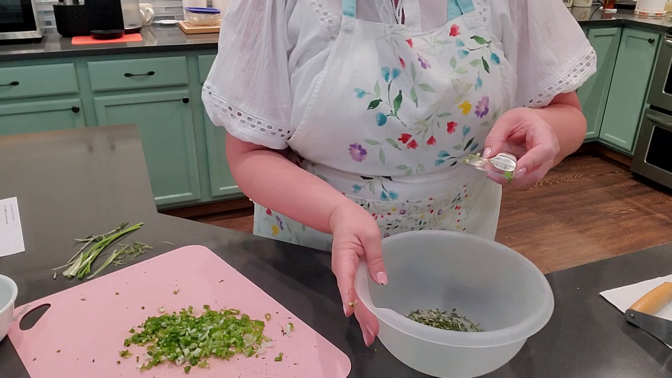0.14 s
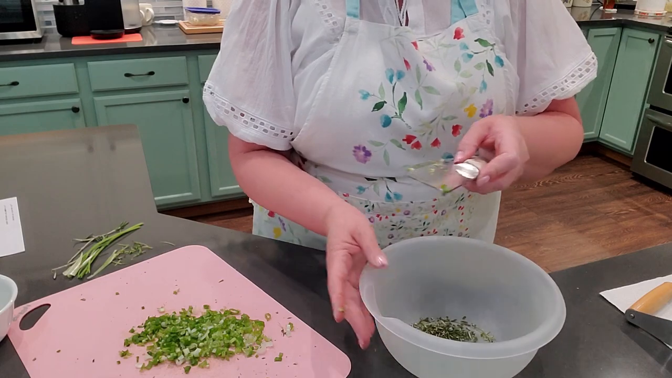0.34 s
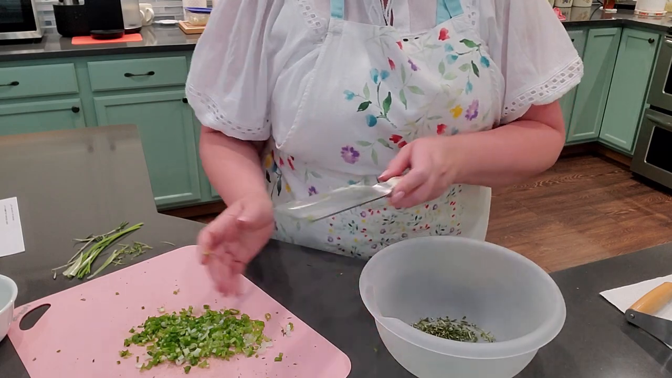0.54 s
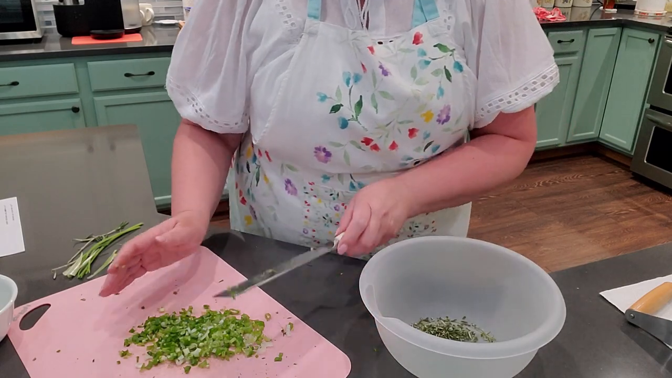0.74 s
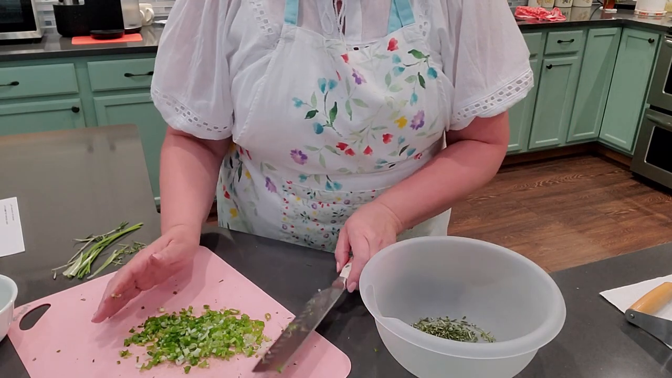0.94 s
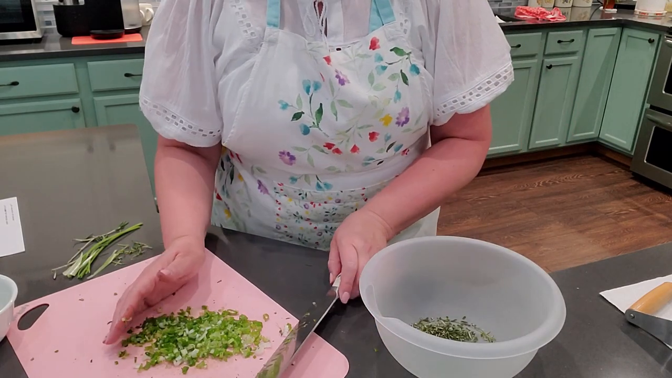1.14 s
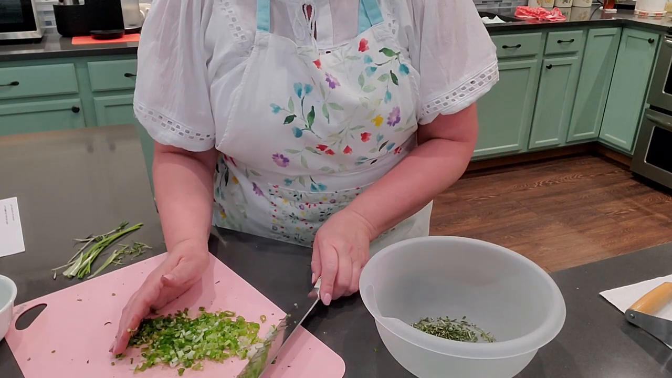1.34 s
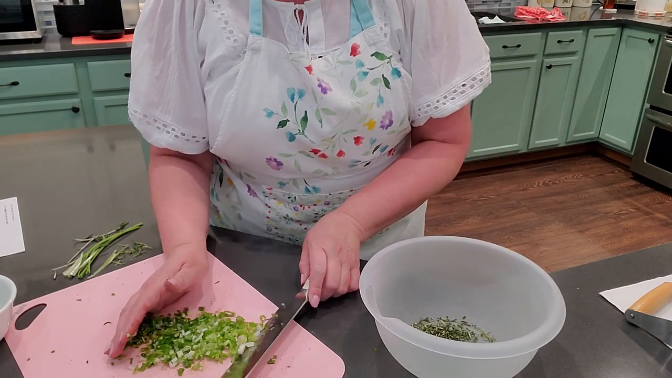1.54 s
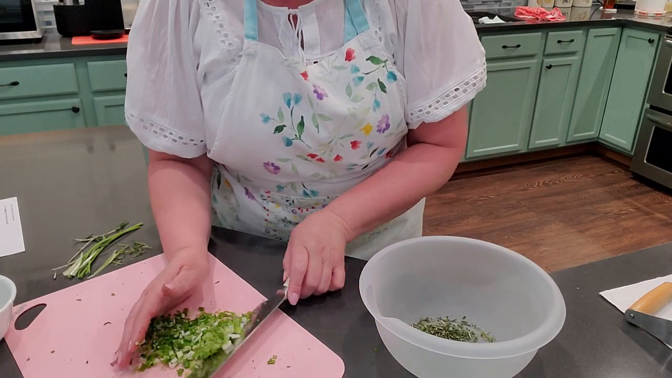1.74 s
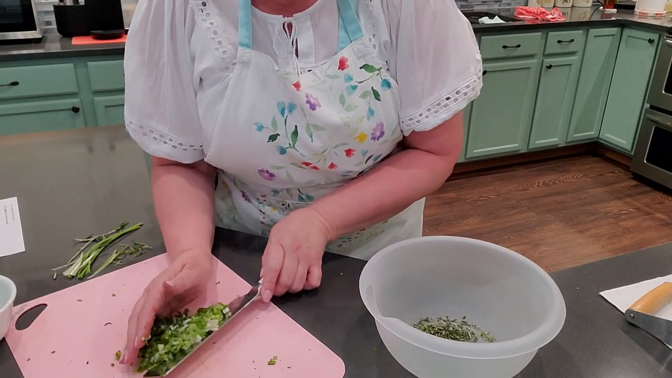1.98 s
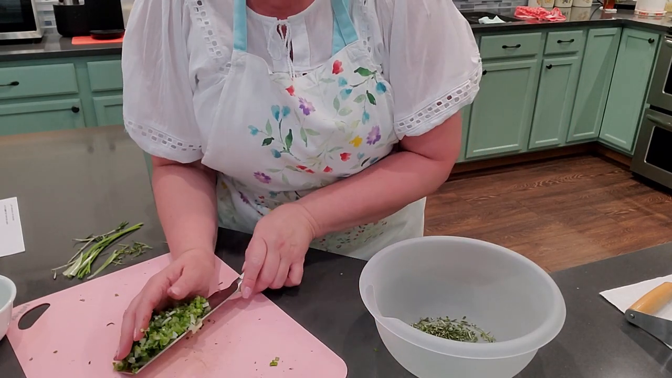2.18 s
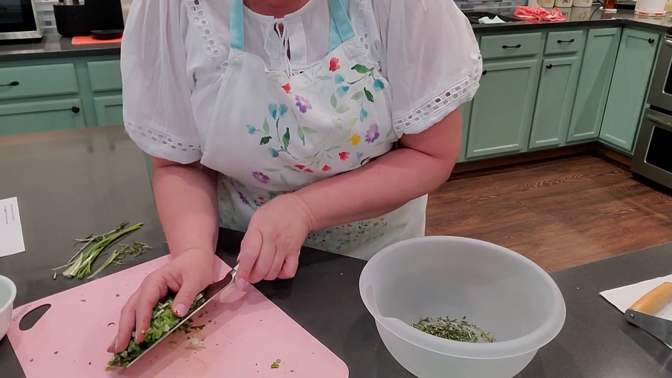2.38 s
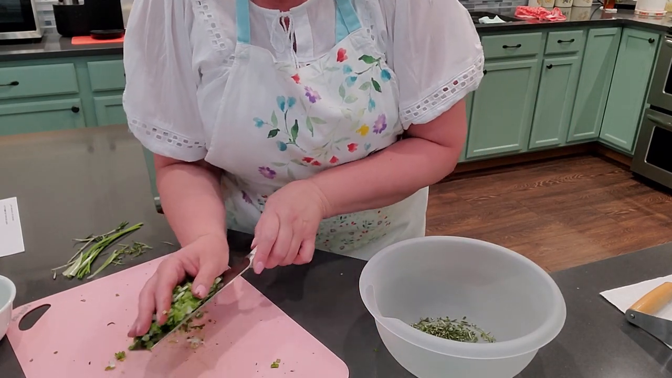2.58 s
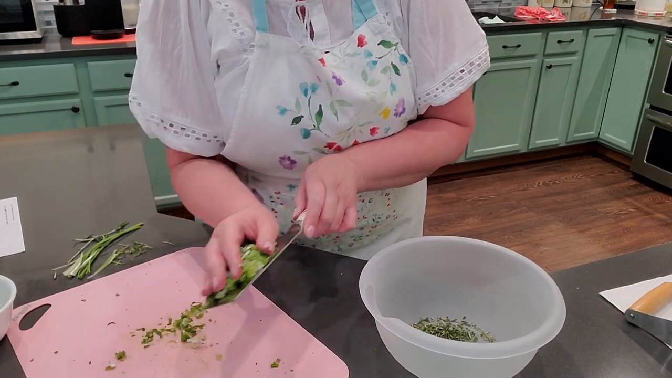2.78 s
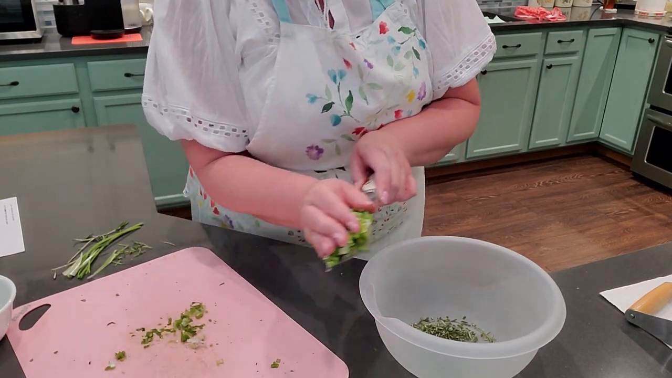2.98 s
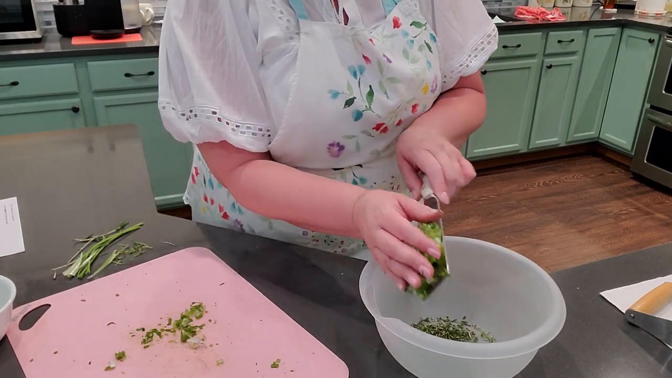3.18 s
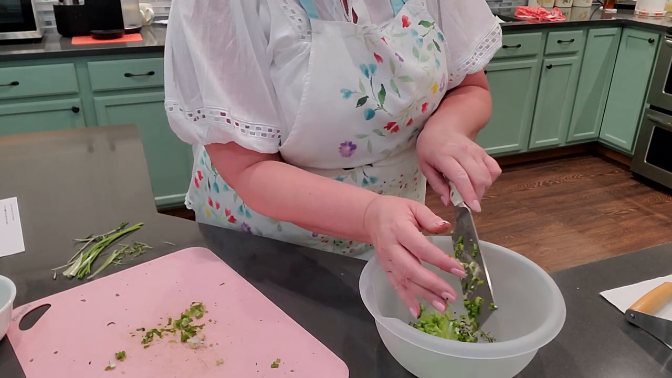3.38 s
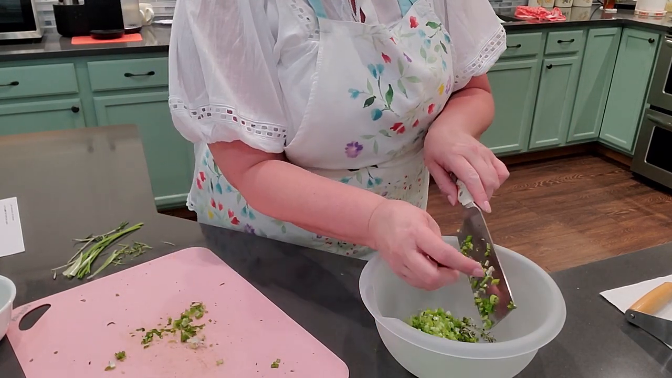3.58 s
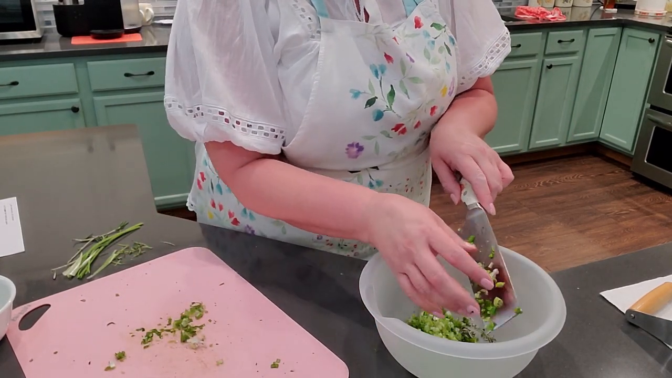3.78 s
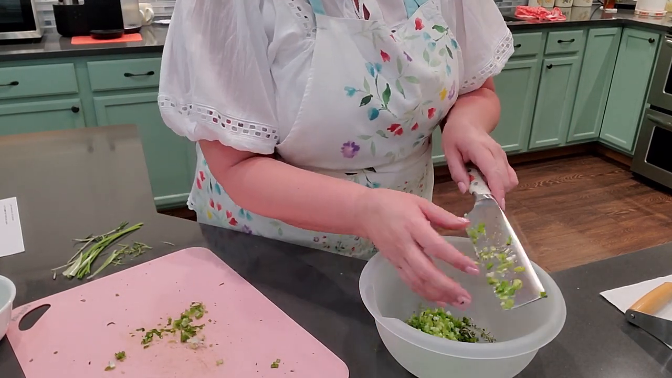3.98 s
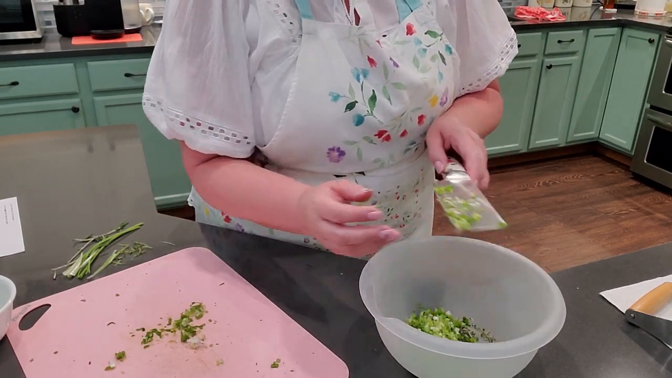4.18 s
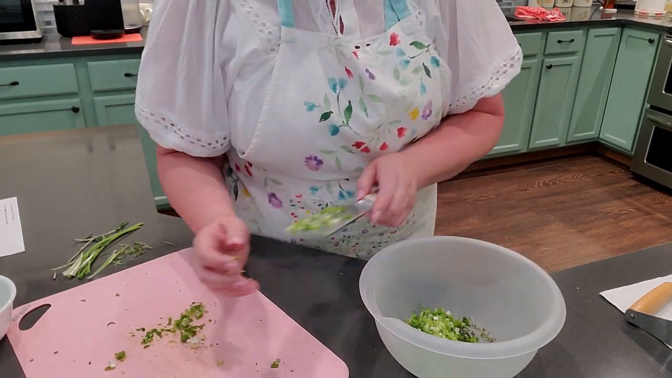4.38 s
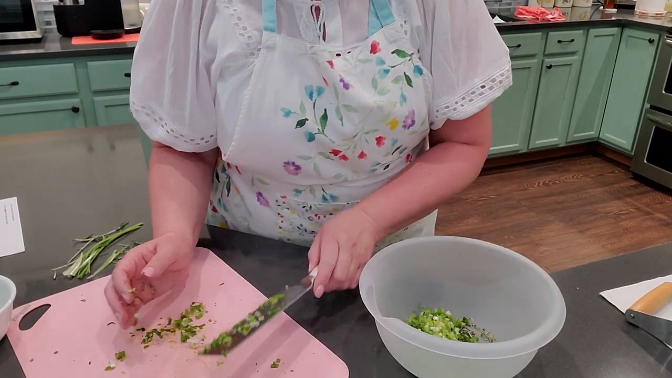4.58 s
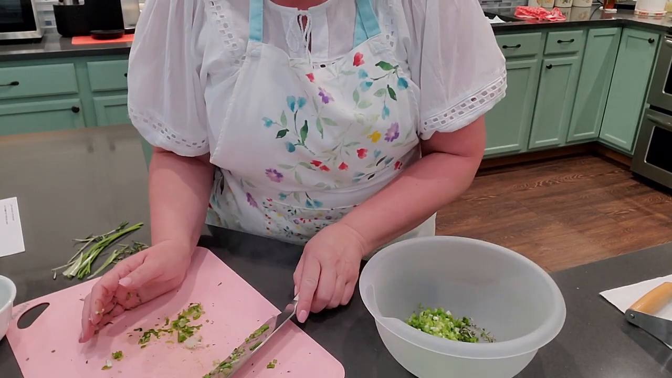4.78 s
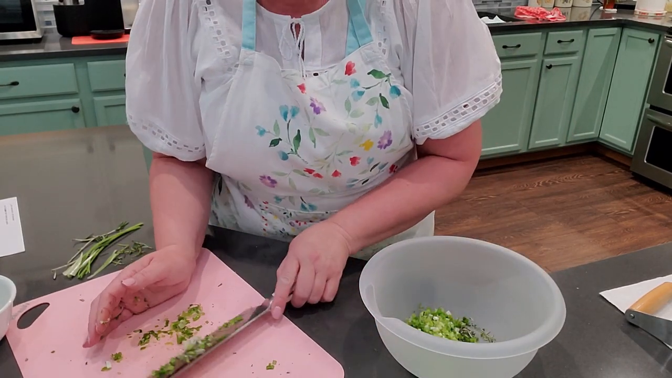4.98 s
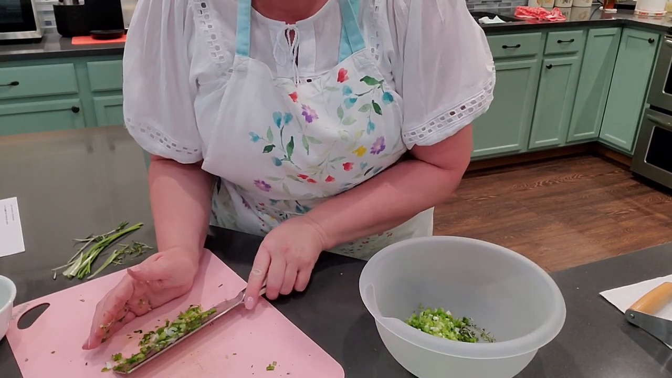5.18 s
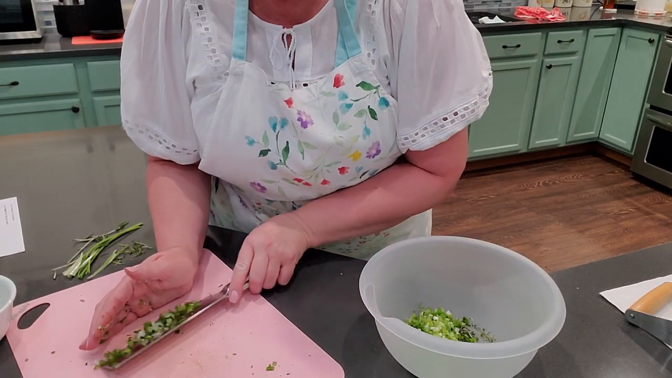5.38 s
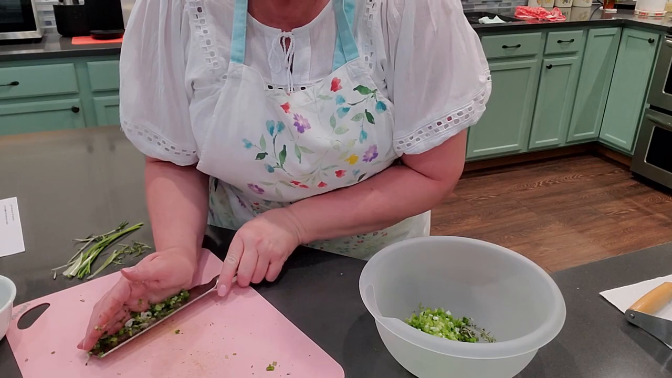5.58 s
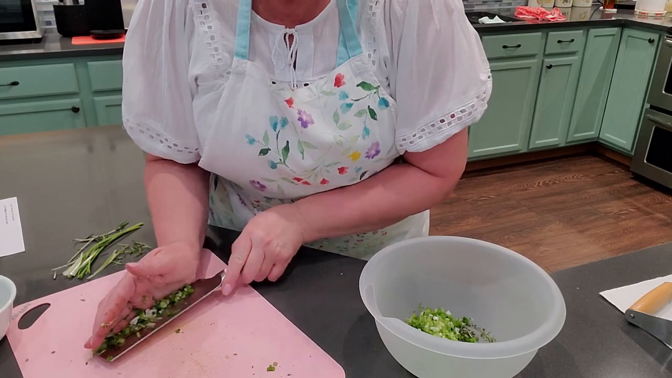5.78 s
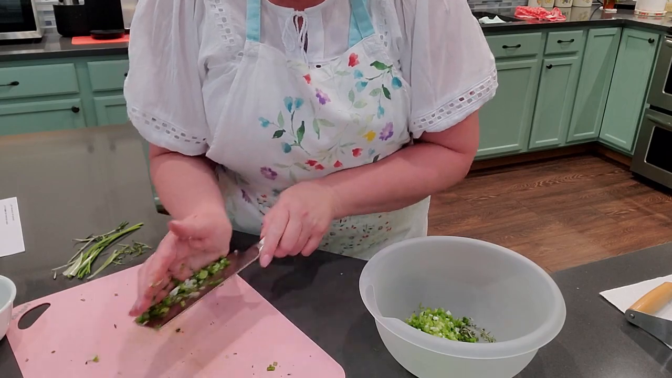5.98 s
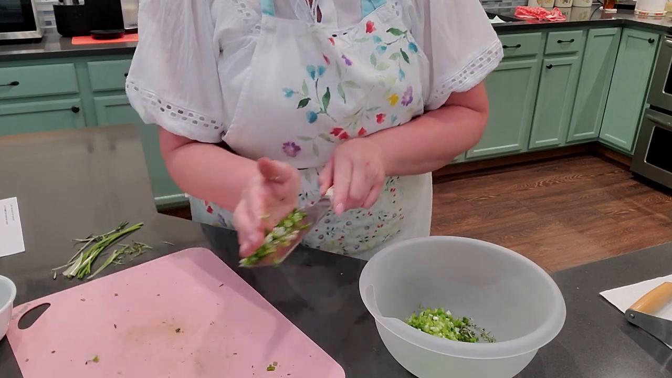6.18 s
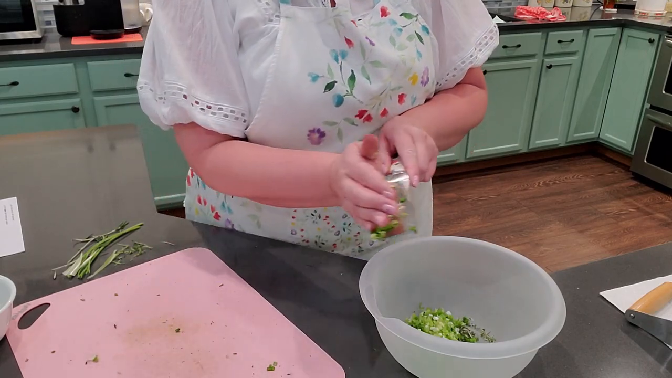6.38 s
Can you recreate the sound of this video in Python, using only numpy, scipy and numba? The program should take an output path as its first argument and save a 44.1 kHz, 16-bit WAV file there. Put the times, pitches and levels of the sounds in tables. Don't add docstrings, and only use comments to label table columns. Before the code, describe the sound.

A hard-surfaced kitchen, heard in stereo from about a metre, with low wavering appliance rumble and faint hiss throughout. Almost immediately, at 0.05 s, a plastic bowl hits a stone counter: the loudest sound, a hollow crack with a brief plastic ring and quick room echoes, followed by faint brushing and tiny rocking until 0.45 s. From about 1.1 to 2.2 s a knife ticks on a plastic board and scrapes in overlapping gritty strokes, strongest near 1.4 s, with narrow squeaks around 1.2-1.5 kHz. Near silence follows, with barely audible touches around 2.7 s. At 3.25-3.55 s soft onion pieces patter rapidly into the bowl with a light brush. A faint tap comes at 4.27 s. Sharp blade clacks at 4.81 and 4.92 s lead into strong squeaky scraping near 4.95 s, softer pushing around 5.3 s, and a bright scrape at 5.5 s. Faint touches end it, leaving rumble to 6.4 s.

```python
import sys
import numpy as np
from scipy import signal
from scipy.fft import rfft, irfft, next_fast_len
from scipy.io import wavfile
from scipy.ndimage import uniform_filter1d
from numba import njit

SR = 44100
rng = np.random.default_rng(int(sys.argv[2]) if len(sys.argv) > 2 else 0)


def volts(x):
    e = np.asarray(x, float) / 20
    return 10 ** e


def waveform_to_disk(signal):
    frames = np.transpose(np.atleast_2d(signal))
    scaled = np.clip(frames, -1, 1) * 32767
    samples = np.round(scaled).astype(np.int16)
    wavfile.write(sys.argv[1], SR, samples)


N = 283991
M = 2 * next_fast_len(N // 2 + SR // 4)
HZ = np.maximum(np.arange(M // 2 + 1) * SR / M, 1)
T = np.arange(N) / SR


def read(table, hz=HZ):
    f, v = np.transpose(table)
    return np.interp(np.log(hz), np.log(f), v)


def unit(x):
    return x / np.sqrt(np.mean(x ** 2))


def shape(x, gain):
    return irfft(rfft(x, M) * gain, M)[..., :N]


def causal(gain_db):
    cepstrum = irfft(gain_db * np.log(10) / 20, M)
    cepstrum[1:M // 2] *= 2
    cepstrum[M // 2 + 1:] = 0
    return np.exp(rfft(cepstrum))


def band(lo_hz, hi_hz, order=6):
    return 1 / np.sqrt((1 + (lo_hz / HZ) ** (2 * order)) * (1 + (HZ / hi_hz) ** (2 * order)))


def pair(mid, side, alike):
    likeness = np.clip(read(alike), 0, 1)
    m = shape(mid, np.sqrt((1 + likeness) / 2))
    s = shape(side, np.sqrt((1 - likeness) / 2))
    return np.array([m + s, m - s])


def walk(rate_hz):
    k = int(SR / rate_hz)
    held = np.repeat(rng.standard_normal(N // k + 1), k)
    return unit(uniform_filter1d(uniform_filter1d(held, k), k)[:N])


@njit
def svf(x, hz, width):
    y, b, l = np.empty(len(x)), 0., 0.
    for i in range(len(x)):
        g, k = np.tan(np.pi * hz[i] / SR), width / hz[i]
        v = (b + g * (x[i] - l)) / (1 + g * (g + k))
        b, l, y[i] = 2 * v - b, l + 2 * g * v, k * v
    return y


def resonate(x, hz, width_hz):
    return np.array([svf(side, hz, width_hz) for side in x])


FADE_DB, FADE_CURVE = 23.5, 1.4


def swell(peak_s, swell_s, fade_s, db):
    away = np.where(T < peak_s, (peak_s - T) / swell_s, (T - peak_s) / fade_s)
    return volts(db - FADE_DB * np.minimum(away, 4) ** FADE_CURVE)


# (peak [s], swell [s], fade [s], board level [dB], brightness [dB])
PRESSED = [(1.1, 0.22, 0.17, -71.5, 2), (1.221, 0.11, 0.091, -60, 1), (1.326, 0.029, .05, -41.5, -1),
           (1.392, 0.056, 0.11, -38, -3), (1.61, 0.092, 0.1, -44.5, -2.5), (1.69, 0.15, 0.11, -48, -3),
           (1.775, 0.061, .1, -42.5, 5), (1.85, 0.21, 0.16, -44.5, 2), (1.92, 0.1, 0.07, -41.5, 2),
           (2.04, 0.15, 0.096, -52, 1.5), (2.115, 0.094, 0.082, -45, 0), (2.234, 0.029, 0.082, -64.5, 2),
           (2.42, 0.097, .1, -75.5, -0.5), (4.808, 0.018, .01, -58, -2.5), (4.83, .02, 0.026, -47.5, 3.5),
           (4.923, 0.026, .06, -36, -2.5), (4.974, 0.058, 0.039, -35, -2), (5.865, .03, .05, -69, -8)]
SKIMMED = [
    (5.1, 0.13, 0.13, -41, -0.5),
    (5.477, 0.055, 0.089, -36.5, 4),
    (5.529, 0.093, 0.074, -45, -1),
    (5.62, .05, 0.19, -68.5, -7),
    (5.835, 0.023, .06, -77, 6),
]
HEAPED = [
    (5.27, .06, 0.17, -48, 0.086),
    (5.31, .05, 0.075, -47.5, 0.011),
    (5.359, .05, .06, -44, 0),
    (5.42, .03, .04, -55, 2),
]
BRUSHED = [
    (0.099, 0.026, .12, -47.5, -3),
    (.2, .08, 0.18, -62, 0.5),
    (.295, 0.1, 0.11, -56.5, 0.5),
    (.445, 0.022, 0.058, -66, -9.5),
    (3.39, 0.073, 0.065, -49, 1.5),
    (3.48, .1, .16, -61.5, -2.5),
    (3.679, 0.1, .08, -82, 12),
    (4.29, .02, 0.17, -69.5, -6),
]
# (pocket [dB re board], edge [dB re board], fine hiss [dB re board], board pitch [Hz])
CONTACTS = [
    (-1.5, -9.5, -12.5, 2400),
    (-8.5, -6.5, -9, 3050),
    (-15, -6, -8.5, 1800),
    (-10.5, -4.5, -14, 2650),
]
EDGE_PER_BRIGHT, HISS_PER_BRIGHT, BOARD_HZ_PER_BRIGHT = 0.99, 1.5, 80


def contact():
    power = np.full((4, N), 1e-30)
    pitch = np.full(N, 2500e-30)
    for rubs, (pocket_db, edge_db, hiss_db, board_hz) in zip((PRESSED, SKIMMED, HEAPED, BRUSHED), CONTACTS):
        for *row, bright_db in rubs:
            bright_edge_db = edge_db + EDGE_PER_BRIGHT * bright_db
            bright_hiss_db = hiss_db + HISS_PER_BRIGHT * bright_db
            layers_db = np.array([pocket_db, 0, bright_edge_db, bright_hiss_db])
            rub_power = swell(*row) ** 2
            power += np.outer(volts(layers_db) ** 2, rub_power)
            pitch += rub_power * (board_hz + BOARD_HZ_PER_BRIGHT * bright_db)
    return np.sqrt(power), pitch / power[1]


# (peak [s], swell [s], fade [s], level [dB], pitch [Hz])
SQUEALS = [(1.02, 0.091, .1, -77.5, 1410), (1.185, 0.018, .05, -60.5, 1173), (1.42, .05, .05, -46.5, 1550),
           (1.619, .04, .04, -51.5, 1295), (1.695, 0.0297, .03, -45.5, 1198),
           (1.757, .03, .03, -48.5, 1100), (1.92, .12, .09, -40.5, 1501), (2.04, .05, .04, -47, 1522),
           (2.116, .05, 0.02, -46.5, 1176), (4.986, 0.078, .04, -36, 1243), (5.05, .04, .07, -45.5, 1402)]


def squeals():
    power = np.array([swell(*row[:4]) ** 2 for row in SQUEALS]) + 1e-30
    total = power.sum(axis=0)
    return np.sqrt(total), np.array(SQUEALS)[:, 4] @ power / total


# (frequency [Hz], likeness [0-1])
RUB_ALIKE = [(300, .95), (1400, 1), (3100, 0.38), (6800, 0.3), (15000, 0.2)]


def slipping(catch_share=.08, smooth_db=-3):
    slips = rng.random(N) < catch_share
    mid, side = [unit(slips * rng.standard_normal(N)) + volts(smooth_db) * rng.standard_normal(N)
                 for _ in range(2)]
    return pair(mid, side, RUB_ALIKE) * volts(walk(SR / 500) + .6 * walk(300))


RUB_EDGES_HZ = [1080, 2000, 5000, 8300, 16000]
# (frequency [Hz], density [dB per Hz])
RUB_TILT = [(1060, -31.5), (1800, -5), (3090, -1), (6020, -10), (6710, -7.5), (7770, -14), (8360, -25.5),
            (11000, -16), (13900, -17.5), (16000, -23)]
BLADE_HZ = [2000, 2280, 2690, 3035, 3400, 3610, 4020, 4432, 4850, 6364, 6180, 6630, 10800, 10970, 12360,
            12500]


def rubbing(pocket_width_hz=100, board_width_hz=750, board_db=10, peak_db=8, wander_db=4.5, drift=0.04,
            mode_width_hz=70, skirt_db=-13):
    (low, *above), board_hz = contact()
    sing, pocket_hz = squeals()
    grit = slipping()
    gains = [band(lo, hi, order=10) for lo, hi in zip(RUB_EDGES_HZ, RUB_EDGES_HZ[1:])]

    sealed = resonate(resonate(grit, pocket_hz, pocket_width_hz), pocket_hz, pocket_width_hz)
    leaky = grit + volts(3) * resonate(grit, 1.3 * pocket_hz, mode_width_hz)
    skirt = volts(skirt_db) * band(450, 850, order=3)
    out = sing * unit(shape(sealed, gains[0])) + low * unit(shape(leaky, gains[0] + skirt))

    body = grit + volts(board_db) * resonate(grit, board_hz, board_width_hz)
    for hz in BLADE_HZ:
        ratio = hz / BLADE_HZ[0]
        moving_hz = hz * (1 + drift * walk(7))
        mode_gain = volts(peak_db - 4.0 * np.log2(ratio) + wander_db * walk(22))
        body += mode_gain * resonate(grit, moving_hz, mode_width_hz * np.sqrt(ratio))
    for gain, strength in zip(gains[1:], above):
        out += unit(shape(body, gain * volts(read(RUB_TILT)))) * strength * volts(walk(25))
    return out


# (time [s], peak [dB], low ring [Hz], high ring [Hz], treble
# [dB])
BLADE_TAPS = [(1.158, -29.5, 1114, 1347, -13), (1.213, -39.5, 3100, 3400, -31),
              (1.3129, -35.5, 1400, 2020, -7), (1.5525, -44.5, 1780, 2090, -24),
              (2.1011, -63, 1160, 3160, -12), (2.2223, -41.5, 1387, 3350, -5),
              (4.27, -38.5, 2354, 3850, -40), (4.809, -21, 1317, 2280, -20.5),
              (4.832, -49.5, 1166, 1960, -20.5), (4.9132, -27, 2280, 2280, -24),
              (4.9304, -22.5, 1580, 2160, -30)]
SOFT_TAPS = [(1.1193, -59.5, 933, 2040, -3), (2.359, -55, 1240, 2000, -23.5),
             (2.6765, -56, 1054, 2303, -30), (2.7144, -55.5, 1550, 1610, -25),
             (3.252, -51.5, 1910, 2020, -7.5), (3.268, -47, 2580, 4570, -8), (3.3017, -48, 2650, 2700, -8),
             (3.3262, -46, 1940, 3080, -19), (3.3478, -44, 2030, 1980, -21), (3.3532, -38, 2220, 3500, -27),
             (3.3826, -34.5, 1900, 2160, -26), (3.3961, -36, 1880, 3250, -19),
             (3.409, -39.5, 1950, 2280, -30), (3.4229, -47, 1440, 2760, -19.5),
             (3.5388, -46, 2520, 3500, -18.5), (5.8217, -57.5, 1538, 2960, -10),
             (5.8313, -61.5, 1525, 2380, 2.5), (6.0895, -65.5, 943, 3510, -2)]
BOWL_ROCKS = [
    (0.2839, -49.5, 2030, 2010, -15),
    (0.3388, -53, 1970, 2400, -18.5),
]
BLADE_THUD_DB, SOFT_THUD_DB, ROCK_THUD_DB = -20.5, -17, -4.5


def taps(push_db=1, ring_db=-4, treble_s=0.0045, thud_s=0.0054, spread=0.39, lag_s=.0001):
    t = T[:SR // 10]
    push_s, ring_s, rise_s = .003, .022, .0007
    rise = 1 - np.exp(-t / rise_s)
    ring_gains = np.array([1.0, 0.97, .5, 0.25, 0.49, 0.31])
    mid, high, low, deep = np.zeros((4, 2, N))
    rows = [(*r, BLADE_THUD_DB, low) for r in BLADE_TAPS]
    rows += [(*r, SOFT_THUD_DB, deep) for r in SOFT_TAPS]
    rows += [(*r, ROCK_THUD_DB, deep) for r in BOWL_ROCKS]
    for s, db, low_hz, high_hz, treble_db, thud_db, under in rows:
        i = int(s * SR)
        span = slice(i, i + len(t))
        noise = rng.standard_normal((4, len(t)))

        detune = (np.arange(4) + rng.random(4)) / 4
        reach = (1 + spread) * max(high_hz / low_hz, 1) / .85
        hz = np.r_[low_hz, high_hz, .85 * low_hz * reach ** detune]
        ring = ring_gains @ np.sin(2 * np.pi * np.outer(hz, t)) * volts(ring_db - 60 * t / ring_s) * rise

        push_hz = [0.79 * min(low_hz, high_hz), 1.75 * max(low_hz, high_hz)]
        around = signal.butter(3, push_hz, "bandpass", fs=SR, output="sos")
        push = signal.sosfilt(around, (noise[0] + .5 * noise[1:3]) * np.exp(-t / push_s))

        mid[:, span] += volts(db) * (ring + volts(push_db) * push / np.abs(push).max())
        high[:, span] += volts(db + treble_db + 3.5) * noise[1:3] * np.exp(-t / treble_s) * rise
        under[:, span] += volts(db + thud_db + 20.0) * noise[3] * np.exp(-t / thud_s)
    mid[0] = np.roll(mid[0], int(lag_s * SR))
    out = np.zeros((2, N))
    for layer, lo_hz, hi_hz in ((mid, 970, 7500), (high, 2660, 15500), (low, 710, 800), (deep, 380, 1010)):
        out += shape(layer, causal(20 * np.log10(band(lo_hz, hi_hz, order=3))))
    return out


# (frequency [Hz], level [dB], ring [s])
BOWL = [(102, -6.5, 0.63), (475, 3, 0.48), (898.3, -14, 0.053), (1450, -19.5, 0.52), (1540, -12, 0.18),
        (2023, -3.5, 0.52), (2300, -14, 0.23), (2690, -5.5, 0.18), (3380, -15.5, 0.23), (3930, -19, 0.31),
        (4280, -14, 0.51), (4996, -29, 0.41), (5900, -22.5, 0.2), (6200, -32, 4.1), (6680, -16.5, 0.17),
        (6940, -15.5, 0.24)]
RIM = [(330.2, -14.5, 0.0064), (687, -12.5, 0.023), (816, -9, 0.02), (1323, -14, 0.02), (2150, -7, .02),
       (2700, -10.5, 0.035)]
# (frequency [Hz], density [dB per Hz])
CRACK = [(59, -44), (100, -20), (283, -8.5), (524, -4.5), (818, -2), (1360, -15), (1610, -20.5), (2130, -3),
         (3320, -4.5), (6560, -12), (8640, -29), (11600, -12), (16000, -32)]
LANDING_S, LANDING_DB = .0528, -5


def ringing(modes, t, shorten=1, longest_s=np.inf):
    return sum(volts(db - 60 * t / (shorten * min(t60_s, longest_s))) * np.sin(2 * np.pi * hz * t)
               for hz, db, t60_s in modes)


def bowl(ring_db=-27, crack_s=0.0039, shorten=0.73, skid_db=-30, skid_s=0.0073, rough=.2, lag_s=.00015):
    t, out = T[:SR // 2], np.zeros((2, N))
    rattle = pair(*rng.standard_normal((2, N)), RUB_ALIKE)
    blow = (t == 0) + rough * rattle[:, :len(t)] * np.exp(-t / crack_s)
    crack = shape(blow, causal(read(CRACK)))[:, :len(t)]
    hit = volts(1.5) * crack / np.abs(crack).max() + ringing(RIM, t)
    rumble_cut = signal.butter(2, 180, "highpass", fs=SR, output="sos")
    shell = ringing(BOWL, t, shorten, longest_s=.3)
    i = int(LANDING_S * SR)
    out[:, i:i + len(t)] = signal.sosfilt(rumble_cut, hit) + volts(ring_db) * shell
    skid = unit(shape(rattle, band(1700, 3500, order=1)))[:, -i:]
    out[:, :i] = volts(skid_db) * skid * np.exp(-T[i:0:-1] / skid_s)
    out[0] = np.roll(out[0], int(lag_s * SR))
    return volts(LANDING_DB) * out


# (delay [s], left [dB], right [dB])
ECHOES = [
    (.0095, -10.5, -15.5),
    (.013, -18, -16.5),
    (0.022, -30, -12.5),
    (0.036, -25.5, -20),
]


def echoes(x, smear_s=0.0017):
    answer, t = np.zeros((2, SR // 10)), T[:SR // 100]
    for s, *db in ECHOES:
        i = int(s * SR)
        rough = rng.standard_normal(len(t)) * np.exp(-t / smear_s)
        answer[:, i:i + len(t)] += np.outer(volts(np.array(db)), rough / np.sqrt(np.sum(rough ** 2)))
    return shape(x, rfft(answer, M) * band(250, 6200, order=1))


# (frequency [Hz], ring [s])
KITCHEN = [(125, 0.7), (500, .5), (2000, 0.23), (5000, 0.44), (12000, 0.2)]
# (frequency [Hz], likeness [0-1])
RUMBLE_ALIKE = [(60, 0.97), (130, 0.96), (290, 0.8), (640, 0), (1410, 0.03), (3100, 0), (6820, 0),
                (15000, 0)]


def kitchen(x, gap_s=0.0047):
    t, tail = T[:SR], 0
    for hz in 125 * 2. ** np.arange(8):
        octave = band(hz / np.sqrt(2), hz * np.sqrt(2), order=2)
        noise = shape(pair(*rng.standard_normal((2, N)), RUMBLE_ALIKE), octave)
        tail = tail + noise[:, :SR] * volts(-60 * t / read(KITCHEN, hz)) * (t > gap_s)
    return shape(x.mean(axis=0), rfft(tail / np.sqrt(np.sum(tail ** 2) / 2), M))


# (frequency [Hz], density [dB per Hz])
RUMBLE = [(12, -48.5), (20, -21.5), (39, -7.5), (66, -4), (124, -7), (146, -15), (185, -14), (323, -19.5),
          (394, -14.5), (439, -20.5), (576, -18.5), (1500, -36), (1950, -71.5), (3300, -120)]
HISS = [(880, -28), (1500, -2.5), (2510, -7), (3660, -6), (3960, -9), (5120, -10.5), (6500, -7.5),
        (7460, -16), (8000, -31.5), (11200, -12), (16000, -14.5)]
RUMBLE_DB, HISS_DB = -57.5, -74.5
# (time [s], level [dB])
SWELL = [(0, 5), (1, -0.5), (2, 1), (3, 2), (4, -0.5), (5, 1), (5.6, 1), (6.44, 5)]
# (frequency [Hz], level [dB])
WHINE = [(59, -65.5), (118, -69.5), (3548, -88.5)]


def appliances():
    noise = unit(shape(pair(*rng.standard_normal((2, N)), RUMBLE_ALIKE), volts(read(RUMBLE))))
    deep = shape(noise, band(0.92, 130, order=2))
    deep_db = np.interp(T, *np.transpose(SWELL)) + walk(3.7)
    out = volts(RUMBLE_DB) * (deep * volts(deep_db) + (noise - deep) * volts(1.5 * walk(5)))
    out += volts(HISS_DB) * unit(shape(rng.standard_normal((2, N)), volts(read(HISS))))
    for hz, db in WHINE:
        out += volts(db + 3 * walk(5)) * np.sin(2 * np.pi * hz * T + 4.1 * walk(4.8))
    return out


def scene():
    rub, ticks, knock = rubbing(), taps(), bowl()
    early = echoes(volts(5.5) * ticks + volts(3) * knock)
    late = kitchen(volts(-6.0) * rub + volts(-7.0) * ticks + volts(-10.5) * knock)
    return rub + ticks + knock + early + late + appliances()


def roll_off(x):
    return signal.sosfilt(signal.butter(12, 16310, fs=SR, output="sos"), x)


# (frequency [Hz], left minus right [dB])
PORTS = [(60, 1), (200, -0.5), (400, 0.5), (1300, 1.5), (2400, -0.5), (4400, 4), (7500, 2), (10500, 5.5),
         (12500, -1.5), (15000, -8)]
DEAF_HZ, DEAF_WIDTH_HZ, DEAF_DB = 8300, 340, -12
TOP_HZ = 15830


def record(dry):
    deaf_db = DEAF_DB / (1 + ((HZ - DEAF_HZ) / DEAF_WIDTH_HZ) ** 4)
    tilt_db = read(PORTS) / 2
    port_gain = volts(deaf_db + np.array([tilt_db, -tilt_db])) * (HZ < TOP_HZ)
    mix = np.clip(shape(dry, port_gain), -1, 1)
    return roll_off(mix)


dry = scene()
out = record(dry)
waveform_to_disk(out)
```